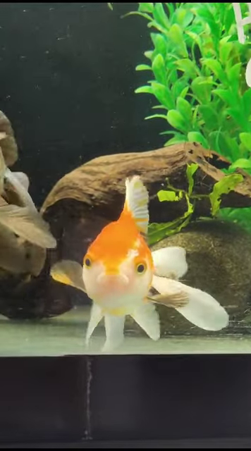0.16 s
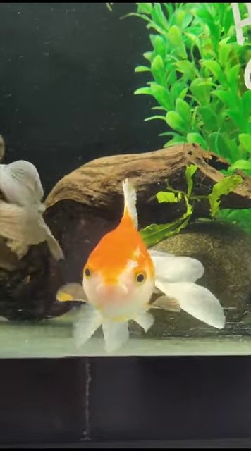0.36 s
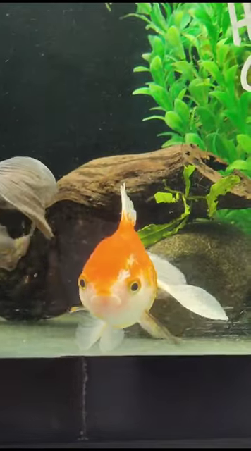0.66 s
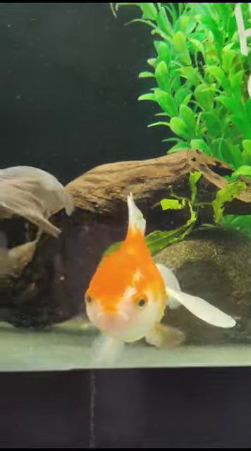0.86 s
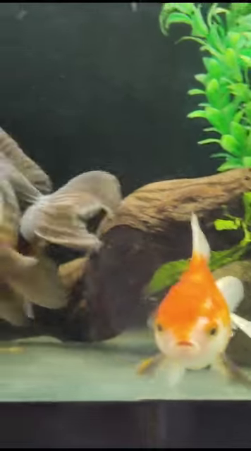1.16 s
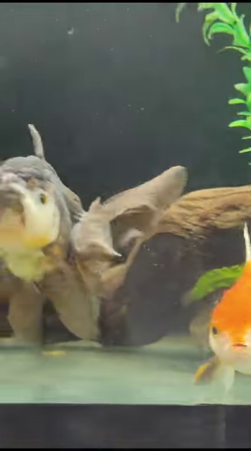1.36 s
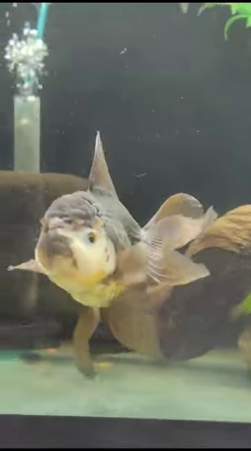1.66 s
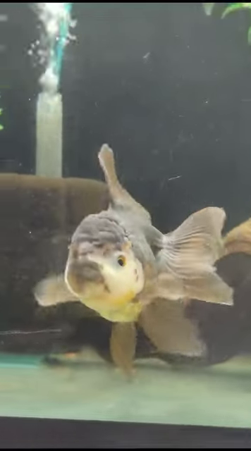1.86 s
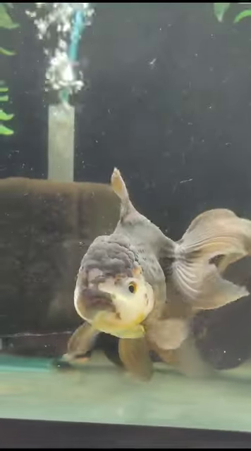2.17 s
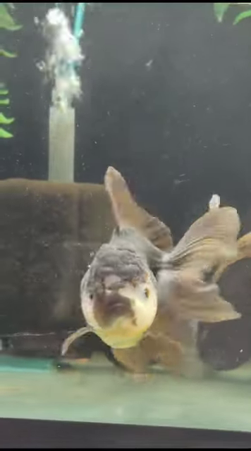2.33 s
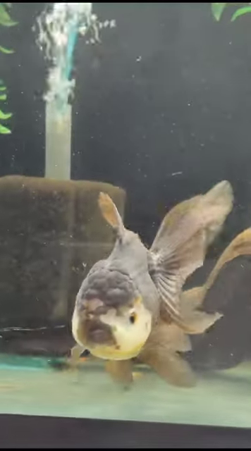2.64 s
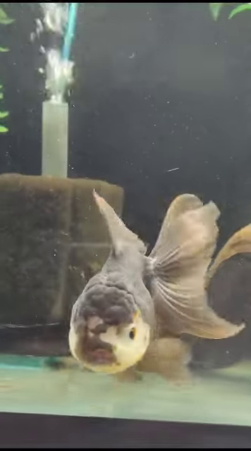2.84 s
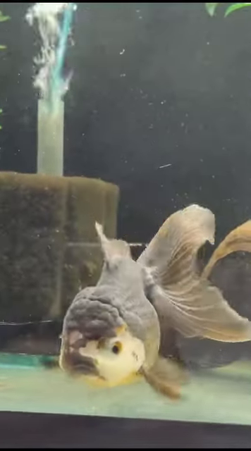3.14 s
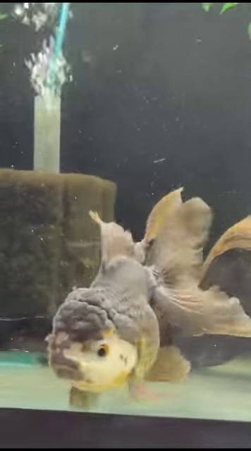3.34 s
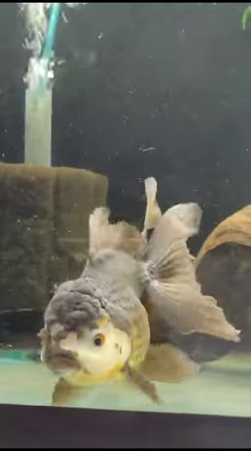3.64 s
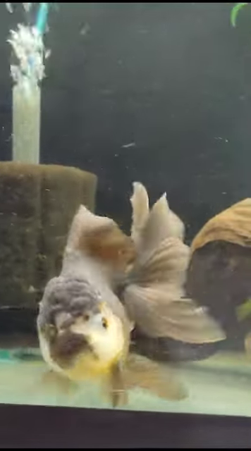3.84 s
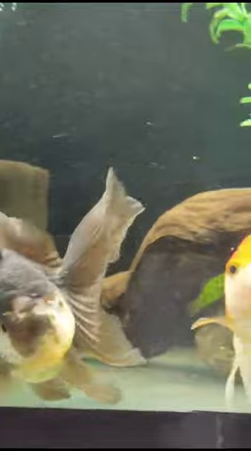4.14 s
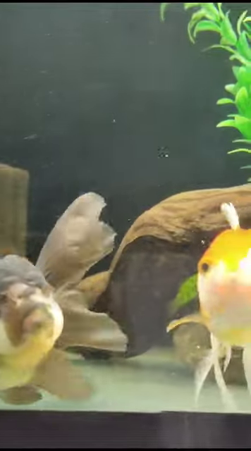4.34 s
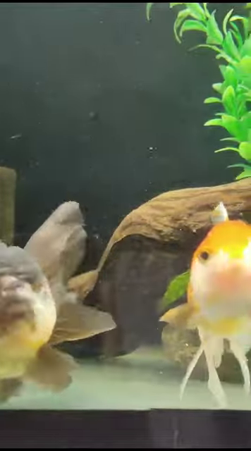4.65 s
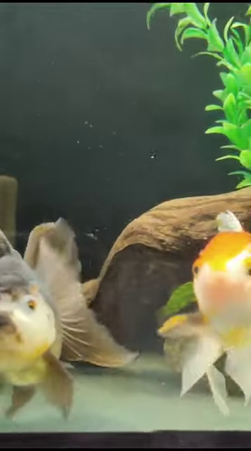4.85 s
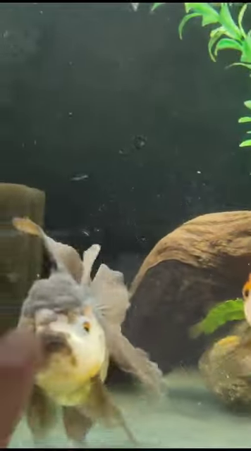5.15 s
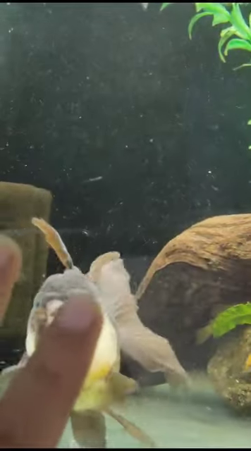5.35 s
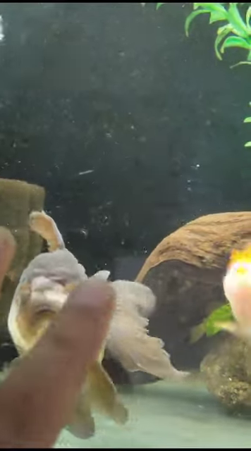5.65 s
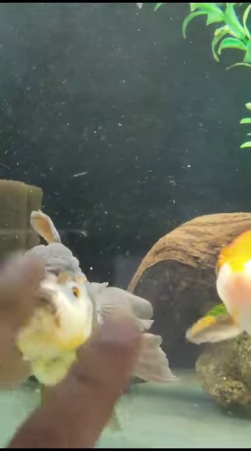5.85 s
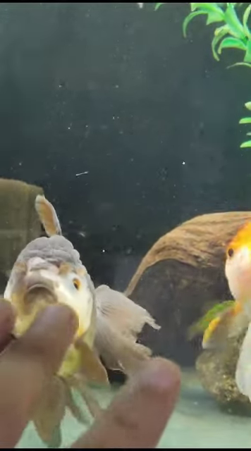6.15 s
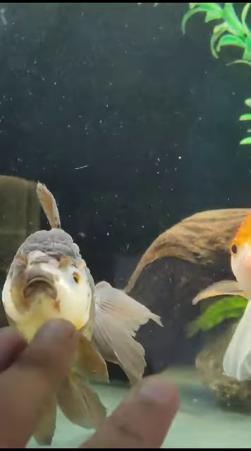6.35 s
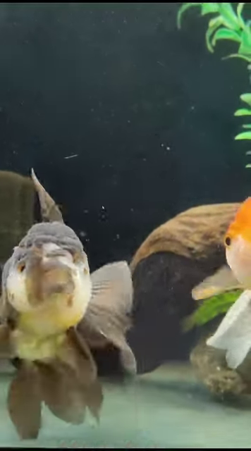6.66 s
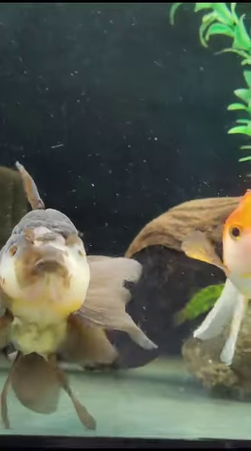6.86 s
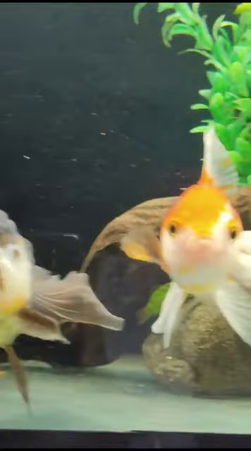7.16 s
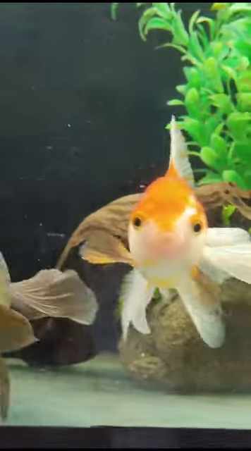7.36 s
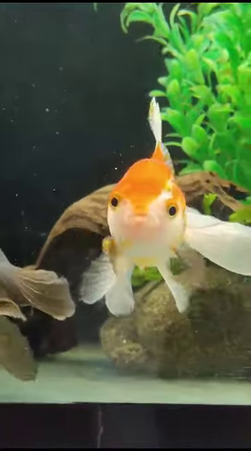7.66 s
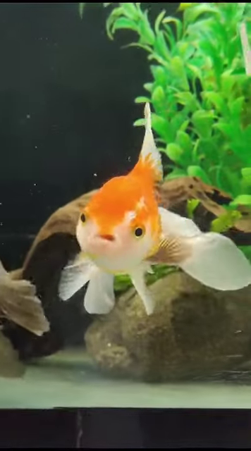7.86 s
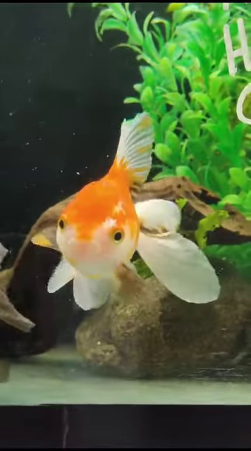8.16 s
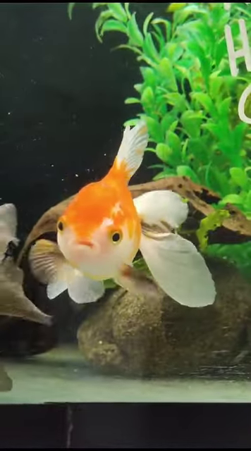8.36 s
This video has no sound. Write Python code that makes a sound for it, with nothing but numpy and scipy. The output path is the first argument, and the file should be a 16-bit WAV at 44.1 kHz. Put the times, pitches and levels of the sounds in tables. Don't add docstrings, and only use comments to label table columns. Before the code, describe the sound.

Close to an aquarium indoors, steady low bubbling and a bright rushing hiss, with a piercing motor whine dropping away, returning, fading, then returning again.

```python
import sys
import numpy as np
from scipy import signal
from scipy.fft import rfft, irfft, next_fast_len
from scipy.io import wavfile
from scipy.ndimage import uniform_filter1d

SR = 44100
rng = np.random.default_rng(int(sys.argv[2]) if len(sys.argv) > 2 else 0)


def attenuation_scalar(level_db):
    decades = np.asarray(level_db, float) / 20
    return 10 ** decades


def persist_wave(psi):
    counts = np.round(np.clip(psi, -1, 1) * 32767).astype(np.int16)
    wavfile.write(sys.argv[1], SR, np.atleast_2d(counts).T)


N = 374850
T = np.arange(N) / SR


def evened(x):
    return x / np.sqrt(np.mean(x ** 2) + 1e-20)


def read(points, hz):
    f, value = np.transpose(points)
    return np.interp(np.log(hz + 1), np.log(f + 1), value)


def columns(rows, t):
    s, *values = np.transpose(rows)
    return [np.interp(t, s, v) for v in values]


def drift(top_hz):
    t = T[::256]
    slow = 0
    for f in np.geomspace(0.12, top_hz, num=16):
        slow = slow + np.sin(2 * np.pi * (f * t + rng.random())) / np.sqrt(f)
    return np.interp(T, t, evened(slow))


def tone(hz, db, waver_db=0.0, waver_turns=0.05):
    turns = hz * T + rng.random() + waver_turns * drift(3.0)
    return np.sqrt(2) * attenuation_scalar(db + waver_db * drift(2.5)) * np.sin(2 * np.pi * turns)


def coloured(x, points):
    size = next_fast_len(N)
    gain = attenuation_scalar(read(points, np.fft.rfftfreq(size, 1 / SR)))
    return irfft(rfft(x, size) * gain, size)[:N]


def bump(s, half):
    return np.exp(-((T - s) / half) ** 2)


SHAFT_HZ, SLOTS, BUZZ_HZ = 58.162, 40, 119.94
LOWER_SIDES = [1]
LOWER_SIDES_DB = [-22]
SHAFT_ORDERS = [4, 16, 38, 42, 43, 62, 79, 81, 83, 121, 123, 125]
SHAFT_DB = [-54, -70, -71, -71, -71, -74, -81, -76, -81, -71, -79, -79]
BUZZ_ORDERS = [6, 6.5, 7, 8, 9, 11, 15]
BUZZ_DB = [-65, -66, -74, -70, -70, -71, -75]
PARTS_HZ = [1576, 2582.6, 2804.7, 2890.8, 3094.1, 3205.8, 3305.3, 3706.4, 3921.7, 4845, 5254, 5663, 5866.5,
            6217.7]
PARTS_DB = [-68, -71, -73, -78, -75, -73, -77, -81, -81, -79, -78, -77, -71, -79]
# (time [s], level [dB])
OVERTONE = [(0, -78), (1.5, -75), (1.78, -60.5), (2.1, -59), (2.23, -62), (2.65, -58.5), (2.82, -66.5),
            (3.62, -69), (3.72, -78), (4.0, -78), (4.15, -65), (4.45, -59), (4.76, -60), (4.87, -67.5),
            (7.1, -65), (7.22, -58), (7.8, -55), (8.5, -57)]
# (time [s], 3rd harmonic level [dB], upper sideband level [dB])
PARTNERS = [(0, -67, -57.5), (1.0, -66, -68), (1.45, -68, -66), (1.78, -79, -81), (2.25, -73.5, -77.5),
            (3.0, -67, -62), (3.5, -71.5, -59), (3.85, -64.5, -59), (4.3, -73, -64), (4.75, -66, -59.5),
            (5.22, -87, -67.5), (5.7, -67.5, -57), (6.1, -67, -59), (6.7, -65.5, -57.5),
            (7.22, -64.5, -80.5), (7.5, -64, -77), (7.9, -80, -62.5), (8.5, -82, -61)]


def motor():
    slot_hz, slot_db = SLOTS * SHAFT_HZ, slot_level()
    second_db = columns(OVERTONE, T)[0]
    third_db, upper_db = columns(PARTNERS, T)
    out = tone(slot_hz, slot_db)
    out += tone(2 * slot_hz, second_db, 0.6)
    out += tone(3 * slot_hz, third_db, 1.0)
    out += tone(slot_hz + SHAFT_HZ, upper_db)
    for order, db in zip(LOWER_SIDES, LOWER_SIDES_DB):
        out += tone(slot_hz - order * SHAFT_HZ, slot_db + db, 1.5)
    out += tone(SHAFT_HZ, -78.5 + 0.3 * (slot_db - slot_db.mean()), 1.0)
    out += tone(BUZZ_HZ, -61 + stream(BUZZ_HZ), 2.0)
    faint_hz = np.r_[np.multiply(SHAFT_ORDERS, SHAFT_HZ), np.multiply(BUZZ_ORDERS, BUZZ_HZ), PARTS_HZ]
    faint_db = np.r_[SHAFT_DB, BUZZ_DB, PARTS_DB] - 1.5
    for hz, db in zip(faint_hz, faint_db):
        out += tone(hz, db, 3.5, 0.2)
    pole = np.exp(-np.pi * 230 / SR)
    flutter = signal.lfilter([1], np.convolve([1, -pole], [1, -pole]), rng.standard_normal(N))
    skirt_db = 0.37 * (slot_db + 28.5) - 66.5
    return out + np.sqrt(2) * attenuation_scalar(skirt_db) * evened(flutter) * np.cos(2 * np.pi * slot_hz * T)


# (time [s], level [dB])
SLOT_PATH = [(0, -36), (1.21, -35), (1.42, -38), (1.5, -48), (2.05, -52.5), (2.82, -48.5), (2.9, -46),
             (3.3, -41.5), (4.2, -35), (4.64, -35), (5.02, -41.5), (5.22, -57.5), (5.64, -58.5),
             (5.73, -48.5), (6.22, -54.5), (6.45, -47.5), (7.45, -35), (8.5, -35)]
# (time of a crest [s], half span [s], sway rate [1/s], depth [dB])
SWAYS = [
    (2.2, 0.4, 3.3, -0.2),
    (2.96, 0.16, 3.1, 2.5),
    (3.63, 0.47, 3.3, 1),
    (5.85, .3, 7.5, 1),
    (6.83, .5, 6.9, 0.7),
    (7.86, 0.47, 2.6, 1),
]


def slot_level():
    level_db = columns(SLOT_PATH, T)[0]
    for s, half, per_s, db in SWAYS:
        level_db = level_db + db * bump(s, half) * np.cos(2 * np.pi * per_s * (T - s))
    return level_db


# (frequency [Hz], density [dB per Hz])
BUBBLE_COLOUR = [(15, -44), (45, -38), (78, -35.5), (118, -13.5), (140, -14), (175, -5), (228, -2),
                 (255, -2), (300, 1), (370, -2), (450, -9.5), (600, -14), (1000, -25), (1500, -61.5)]
# (pitch [Hz], level [dB])
SIZES = [
    (170, -45),
    (320, -43.5),
    (560, -50),
]


def bubbles(per_s=2000.0, spread_db=1.4, cycles=6.5, rise=0.15):
    pitches = np.geomspace(24, 1100, num=30)
    starts = rng.random(N) < per_s / SR
    size = attenuation_scalar(spread_db * np.minimum(rng.exponential(1, N), 5)) * starts
    which = rng.integers(0, len(pitches), N)
    out = np.zeros(N)
    for k, hz in enumerate(pitches):
        one = ring(hz, cycles, rise)
        one = one / np.linalg.norm(one) * np.sqrt(hz)
        out += signal.oaconvolve(size * (which == k), one)[:N]
    out = coloured(out, BUBBLE_COLOUR)
    deep = signal.sosfiltfilt(signal.butter(4, 240, fs=SR, output="sos"), out)
    low = signal.sosfiltfilt(signal.butter(4, 430, fs=SR, output="sos"), out)
    mix = np.zeros(N)
    for (hz, db), x in zip(SIZES, [deep, low - deep, out - low]):
        power = abs(uniform_filter1d(x ** 2, size=5000)) + 1e-20
        mix += attenuation_scalar(db + stream(hz)) * evened(x / power ** 0.3)
    return mix


def ring(hz, cycles, rise):
    u = np.arange(int(3 * cycles / hz * SR)) / SR * hz / cycles
    return u * np.exp(-3 * u) * np.sin(2 * np.pi * cycles * u * (1 + rise * u))


# (time [s], level [dB])
NEAR = [(0, -0.5), (.6, 0.5), (1.3, -0.5), (2.0, -1), (2.5, 0), (3.3, 0.5), (3.9, 1), (4.8, -1.5),
        (5.4, 1.5), (6.0, 0), (6.6, 0.5), (7.1, 1.5), (7.4, -1), (8.5, -2)]
# (time [s], half length [s], depth [dB], pitch of the missing bubbles [Hz])
LULLS = [(.02, 0.11, 5, 170), (.57, 0.17, 11, 172), (1.06, 0.028, 12, 350), (1.475, 0.023, 7.5, 400),
         (1.752, 0.027, 9.5, 201), (2.17, 0.022, 5, 300), (2.568, .035, 11, 198), (3.522, 0.058, 23, 170),
         (3.6, .08, 6, 300), (3.73, .03, 6, 170), (5.475, .03, 9, 204), (6.385, .04, 6, 221),
         (6.7, 0.022, 6, 170), (6.865, 0.031, 9.5, 282), (7.226, 0.057, 9, 250), (7.462, 0.035, 7, 377),
         (7.984, 0.059, 8.5, 350), (8.46, 0.083, 6, 250)]


def stream(hz, lull_octaves=0.53, swell_db=0.87):
    level_db = columns(NEAR, T)[0] + swell_db * drift(6.6)
    for s, half, db, missing_hz in LULLS:
        octaves = np.log2(missing_hz / hz)
        level_db = level_db - db * bump(s, half) * np.exp(-(octaves / lull_octaves) ** 2)
    return level_db


# (time [s], peak level [dB], pitch [Hz])
GULPS = [(0.22, -33, 337), (0.281, -21.5, 321), (0.648, -32, 312), (0.837, -28.5, 232), (1.001, -25, 330),
         (1.37, -26, 323), (1.79, -24, 346), (2.215, -27.5, 349), (2.442, -33, 214), (2.615, -28, 334),
         (2.81, -25.5, 280), (2.931, -35, 340), (3.119, -29, 298), (3.52, -33, 368), (3.852, -31, 280),
         (4.199, -29.5, 261), (4.477, -27, 265), (4.978, -32, 342), (5.308, -25, 217), (5.607, -29, 272),
         (5.911, -28, 276), (6.28, -27.5, 230.4), (6.553, -33, 346), (6.684, -32, 291), (6.774, -27, 270),
         (6.931, -27, 283), (7.096, -26.5, 227), (7.733, -28.5, 326), (7.812, -26.5, 257),
         (8.246, -40, 226)]
# (time [s], peak level [dB], pitch [Hz])
BLIPS = [(0.028, -33, 490), (1.576, -29, 579), (1.859, -34.5, 600), (2.441, -41, 590), (2.578, -38, 556),
         (2.714, -34.5, 600), (2.949, -42, 557), (3.011, -32, 600), (3.151, -29.5, 512), (3.44, -34.5, 528),
         (3.762, -39, 490), (4.242, -31, 510), (5.382, -37, 534), (5.577, -42, 614), (6.055, -33, 488),
         (6.281, -39, 490), (6.312, -30, 530), (7.387, -29.5, 530), (7.558, -32, 512), (8.179, -33, 470),
         (8.23, -31, 495)]


def gulps(cycles=8.84, rise=0.14, trim_db=-7.5, lead=0.1):
    out = np.zeros(N + SR)
    for s, db, hz in GULPS + BLIPS:
        one = ring(hz * (1 - lead), cycles, rise)
        out[round(s * SR):][:len(one)] += attenuation_scalar(db + trim_db) * one / abs(one).max()
    return out[:N]


# (frequency [Hz], density [dB per Hz])
RUSH_COLOUR = [(500, -15), (900, -3), (1350, -0.5), (1750, -4.5), (2300, 0), (2700, -4.5), (3300, -9.5),
               (3700, -14), (4300, -13), (5200, -10.5), (6100, -6.5), (7000, -12), (7800, -17.5),
               (8000, -17)]
# (frequency [Hz], width [Hz], level [dB])
HOUSING = [
    (825, 21, 3.5),
    (970, 47, 6),
    (1249, 15, 5),
    (1406, 29, 7.5),
    (2170, 22, 3),
    (2450, 54, -1),
    (3324, 79, 4),
    (5830, 110, 2.5),
]
# (time [s], level [dB])
FACING = [
    (0, -2),
    (2.1, -1),
    (3.86, 1),
    (4.42, -3),
    (5.05, 1),
    (6.05, 3),
    (6.4, 0.5),
    (8.24, 0),
    (8.5, 2.5),
]
# (share [dB per dB]) for low, mid and fizz
FACING_SHARE = [-0.13, 0.98, -0.26]


def rush(slow_patch_db=2.5, quick_patch_db=0.7, flicker_db=0.5):
    frames, hz = N // 256 + 5, np.fft.rfftfreq(1024, 1 / SR)
    seconds = np.arange(frames) * 256 / SR
    a, b, slow, quick = rng.standard_normal((frames, 513, 4)).T
    slow = evened(uniform_filter1d(uniform_filter1d(slow, size=2, axis=0), size=60, axis=1))
    quick = evened(uniform_filter1d(uniform_filter1d(quick, size=8, axis=0), size=10, axis=1))
    flicker = evened(rng.standard_normal(frames))
    field_db = read(RUSH_COLOUR, hz)[:, None] + slow_patch_db * slow + quick_patch_db * quick
    field_db += flicker_db * flicker
    turning_db = columns(FACING, seconds)[0]
    field_db += np.outer(np.interp(hz, [1500, 3400, 5800], FACING_SHARE), turning_db)
    for f, width, db in HOUSING:
        field_db += (db / (1 + (2 * (hz - f) / width) ** 2))[:, None]
    null_db = 0.6 * (columns(SLOT_PATH, seconds)[0] + 40)
    field_db += np.exp(-((hz[:, None] - SLOTS * SHAFT_HZ) / 110) ** 2) * null_db
    z = (a + 1j * b) * attenuation_scalar(field_db) * (hz[:, None] > 400)
    return attenuation_scalar(-46.0) * evened(signal.istft(z, nperseg=1024, noverlap=768)[1][:N])


# (time [s], level [dB], pitch [Hz], width [Hz], rise [s])
DRIPS = [
    (2.05, -60, 3250, 120, .04),
    (2.055, -62, 6000, 900, .012),
    (3.572, -57, 3560, 60, .012),
    (3.6, -57, 3470, 60, .016),
    (3.638, -56, 3530, 60, .014),
    (3.83, -59, 3320, 80, .012),
    (8.408, -51, 4400, 4500, .011),
    (8.435, -49, 750, 150, .006),
]


def drips():
    out = np.zeros(N)
    for s, db, hz, width, rise in DRIPS:
        u = np.maximum(T - s, 0) / rise
        swell = np.e * u * np.exp(-u)
        noise = evened(uniform_filter1d(rng.standard_normal(N), size=int(SR / width)))
        puff = evened(1 + width / 250 * noise)
        out += attenuation_scalar(db) * swell * np.sqrt(2) * puff * np.sin(2 * np.pi * hz * T)
    return out


def scene():
    return (motor() + bubbles() + gulps() + rush() + drips())[None]


def top_cut(x):
    return signal.sosfilt(signal.butter(12, 12750, fs=SR, output="sos"), x)


def record(dry, depth=0.22):
    z = signal.stft(dry, nperseg=1024, noverlap=768)[2]
    power = abs(z) ** 2 + 1e-20
    usual = uniform_filter1d(power, size=40, axis=2)
    weakness = np.minimum(uniform_filter1d(power, size=3, axis=2) / usual, 1)
    cleaned = signal.istft(z * weakness ** depth, nperseg=1024, noverlap=768)[1][:, :N]
    band_limit = signal.firwin(1023, 7990, window=("kaiser", 11), fs=SR)
    narrow = signal.oaconvolve(cleaned, band_limit[None], "same")
    hiss_band = signal.firwin(255, (10500, 12850), pass_zero=False, fs=SR)
    hiss = evened(signal.oaconvolve(rng.standard_normal(N), hiss_band, "same"))
    hiss_db = -101 + 0.06 * (slot_level() + 40) + drift(20.0)
    return top_cut(narrow + attenuation_scalar(hiss_db) * hiss)


dry = scene()
out = record(dry)
persist_wave(out)
```